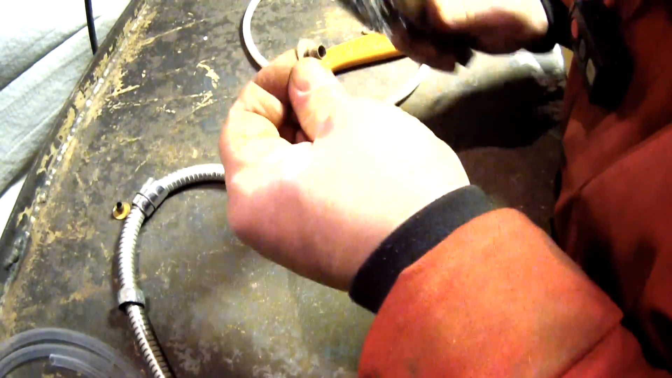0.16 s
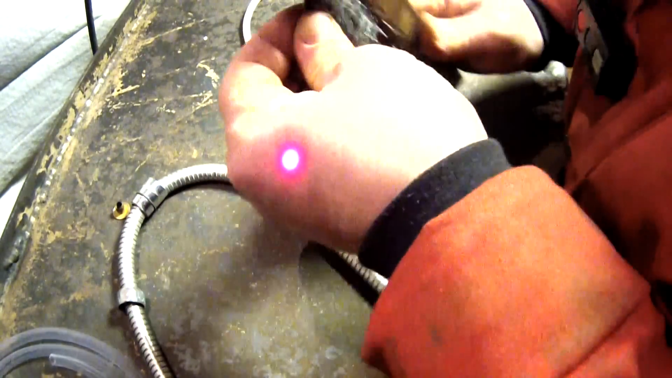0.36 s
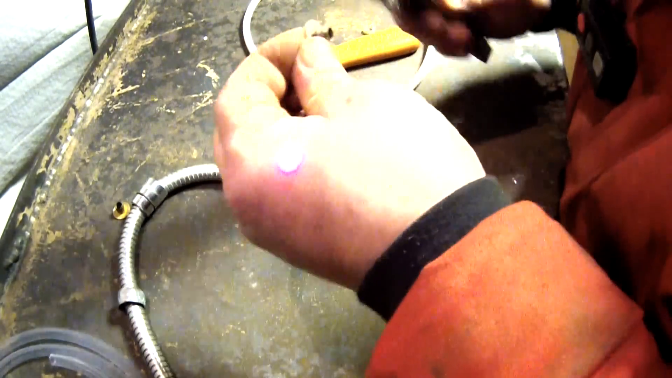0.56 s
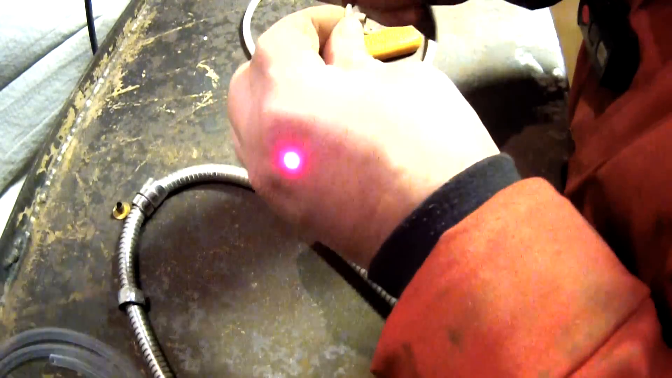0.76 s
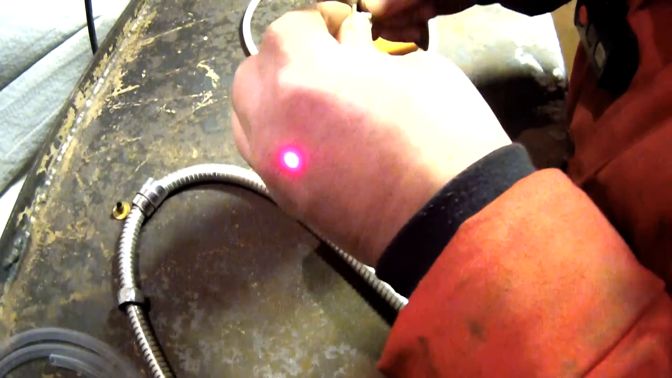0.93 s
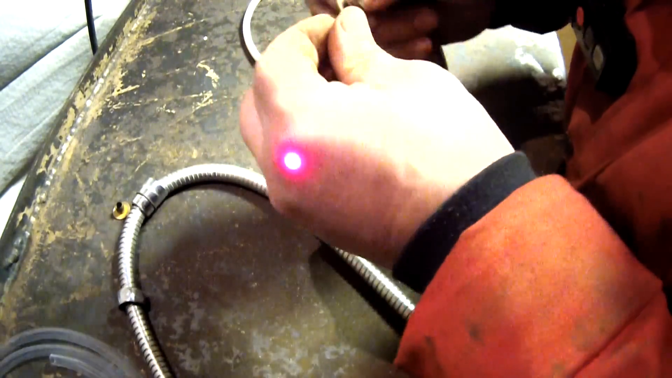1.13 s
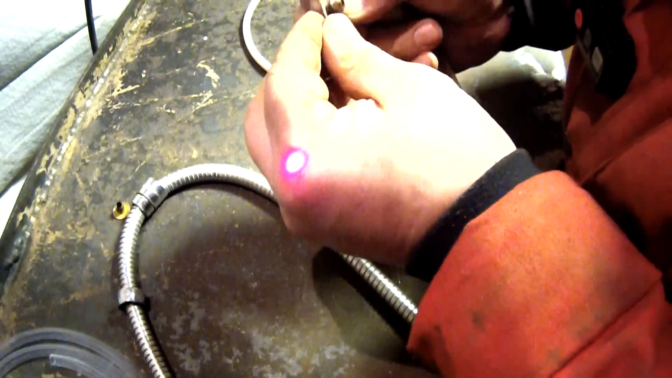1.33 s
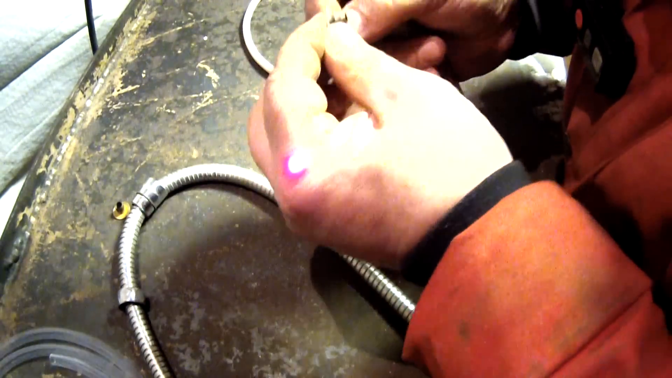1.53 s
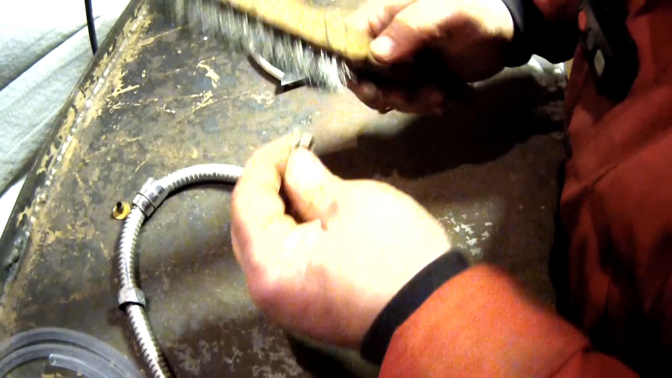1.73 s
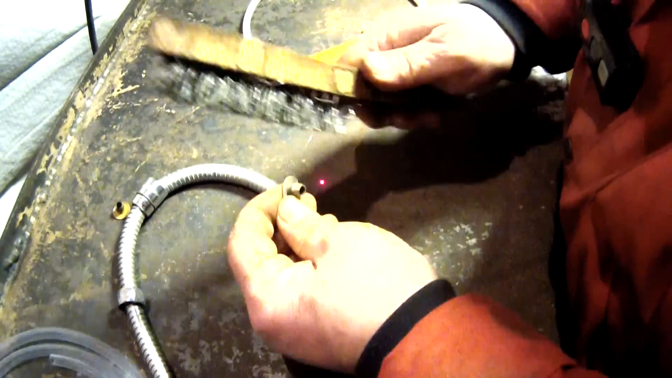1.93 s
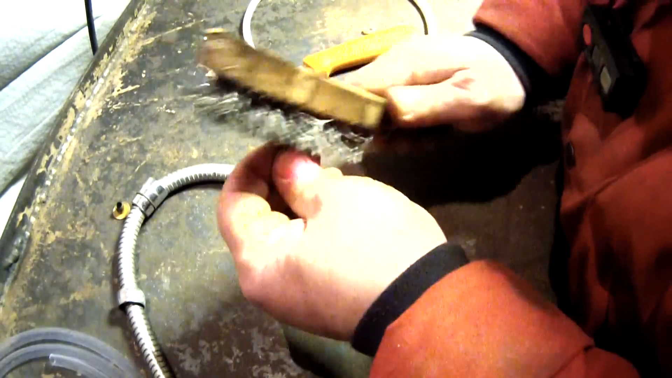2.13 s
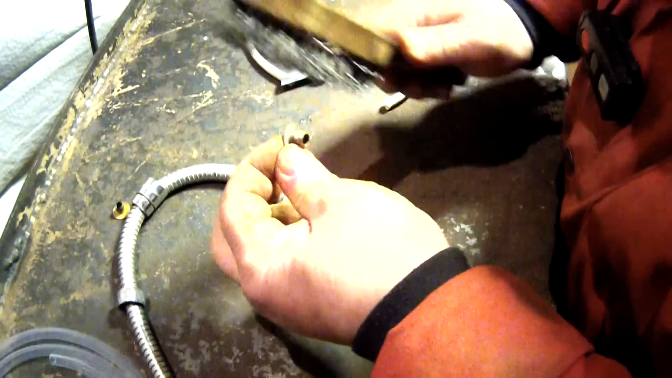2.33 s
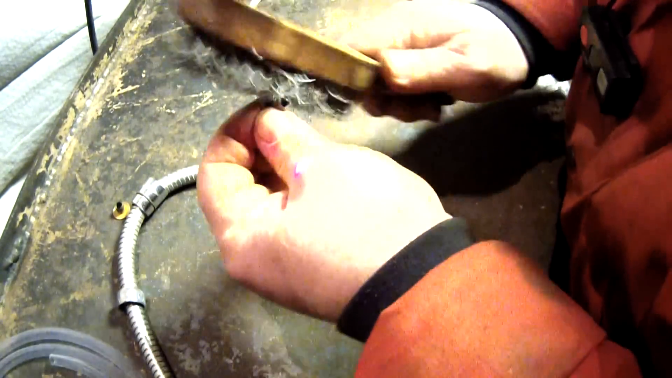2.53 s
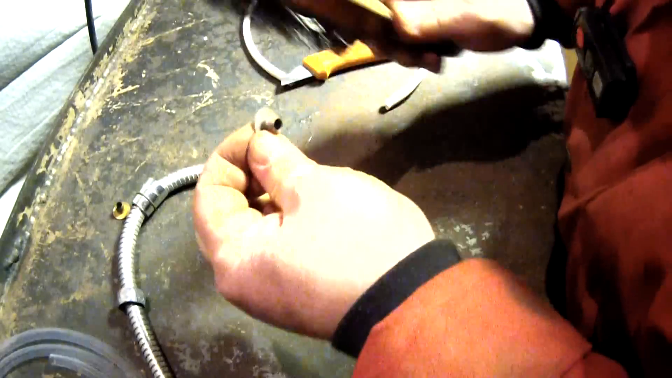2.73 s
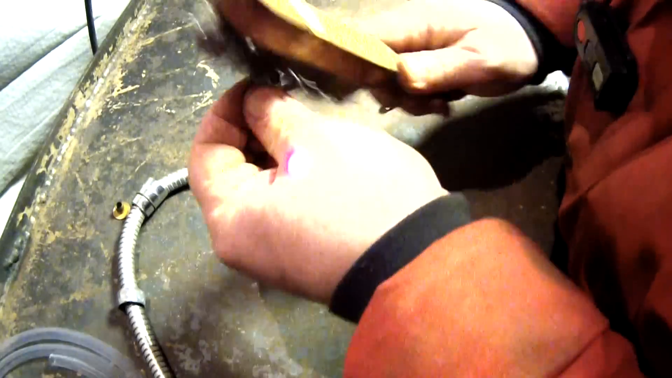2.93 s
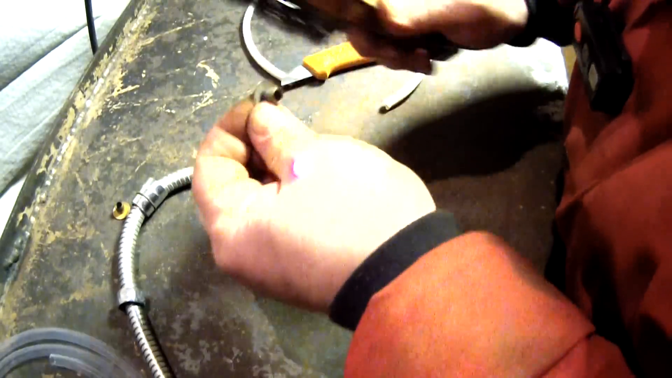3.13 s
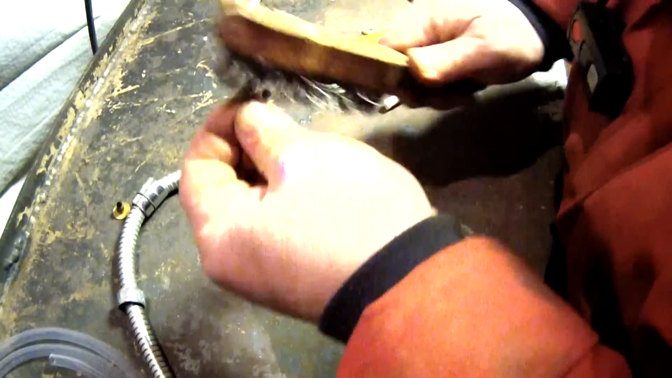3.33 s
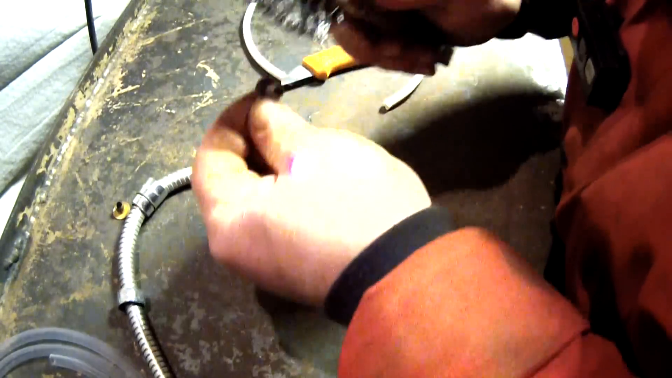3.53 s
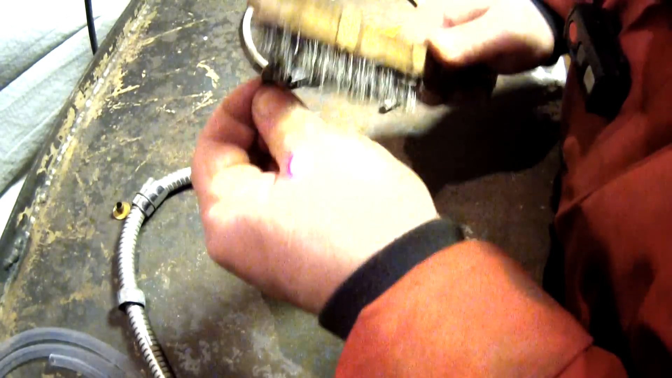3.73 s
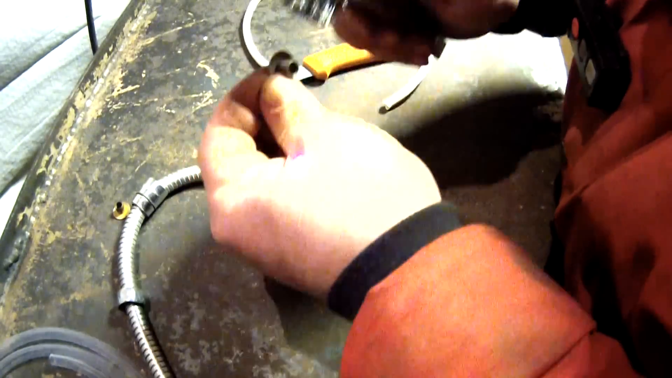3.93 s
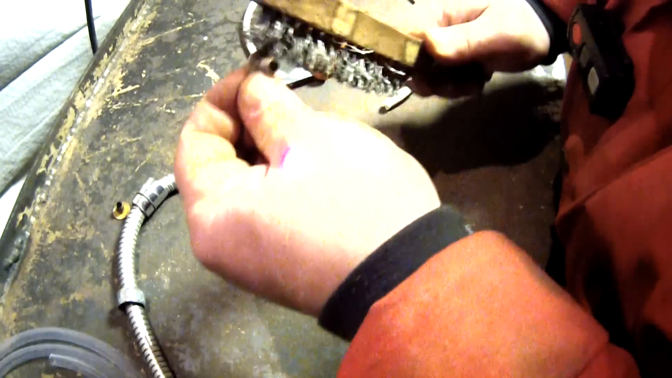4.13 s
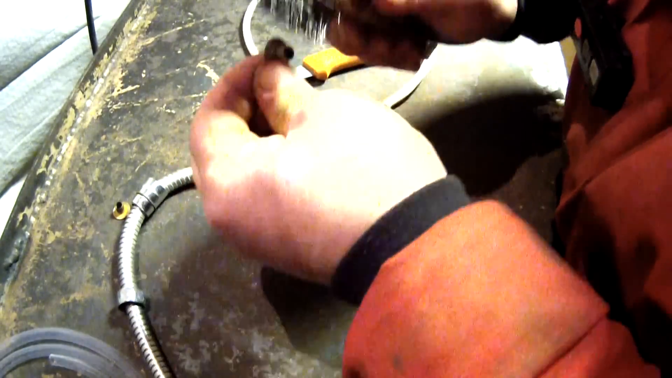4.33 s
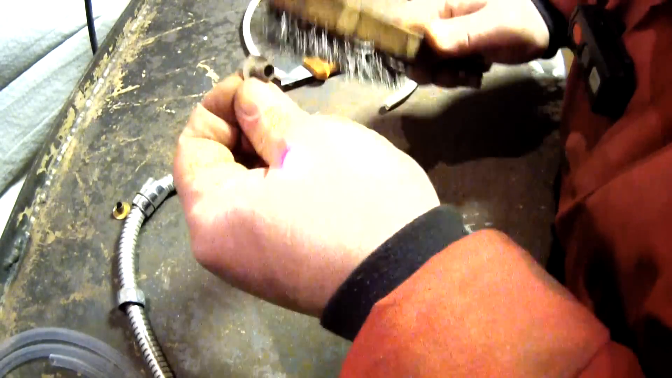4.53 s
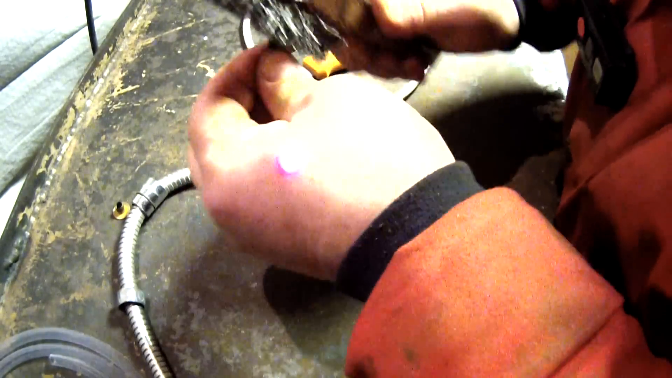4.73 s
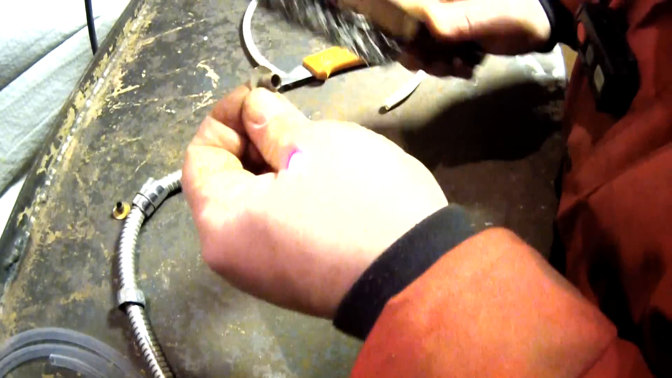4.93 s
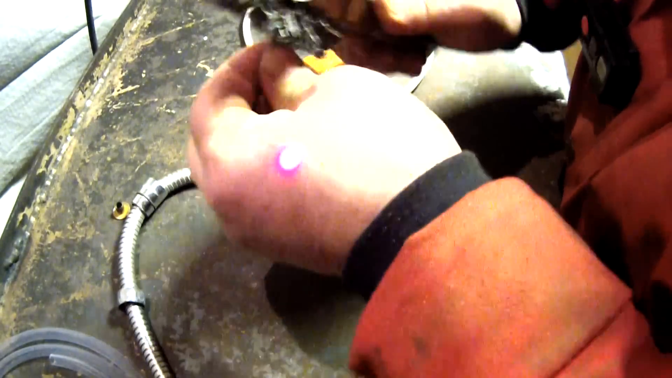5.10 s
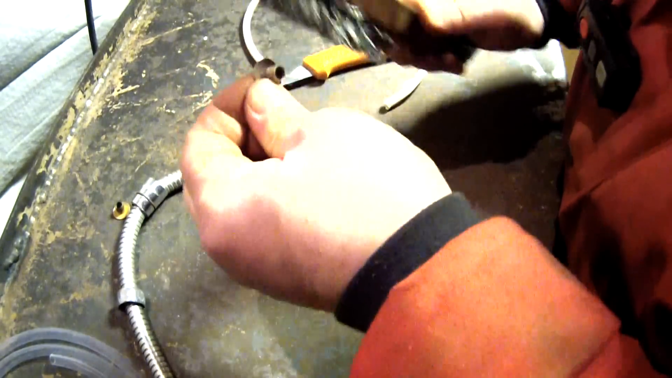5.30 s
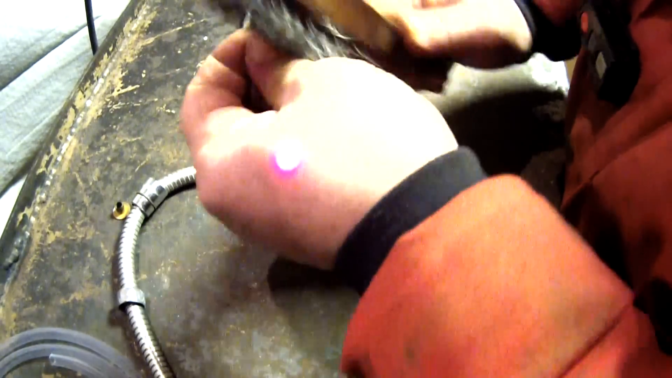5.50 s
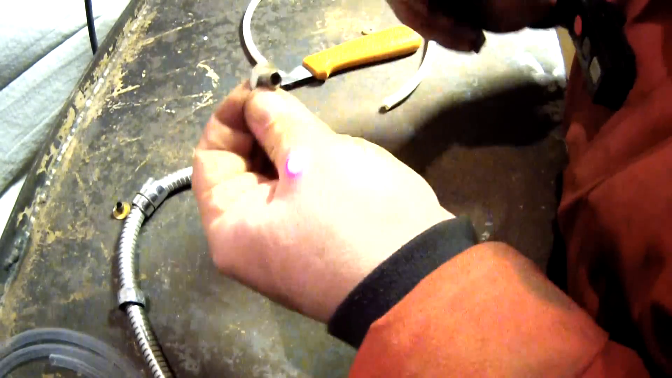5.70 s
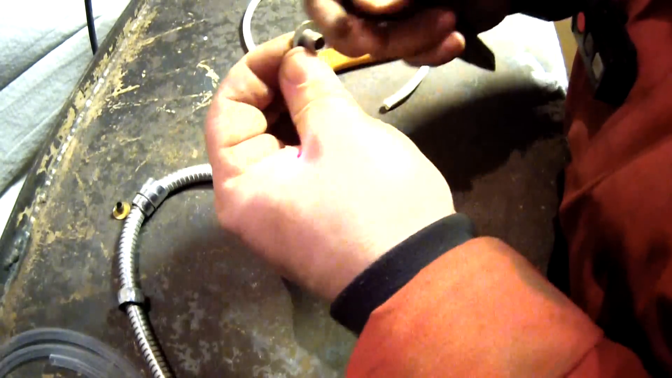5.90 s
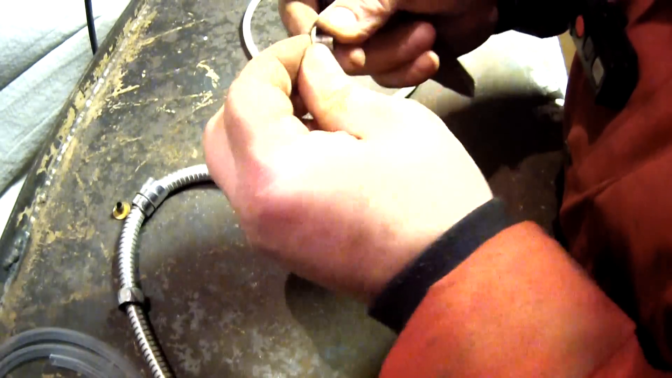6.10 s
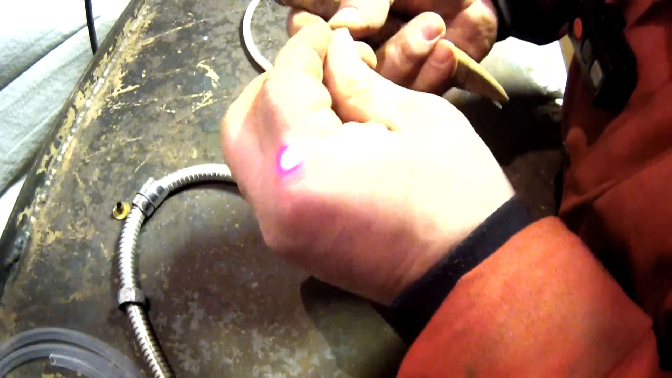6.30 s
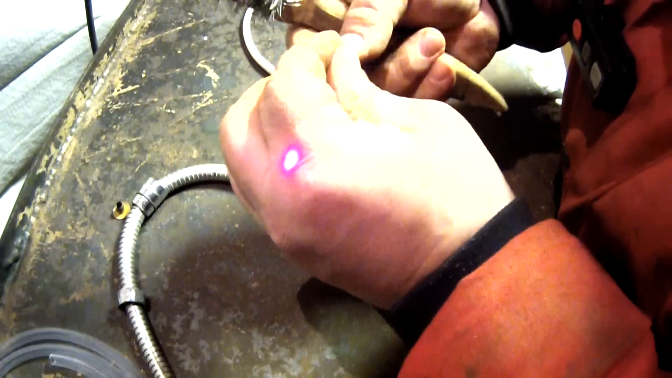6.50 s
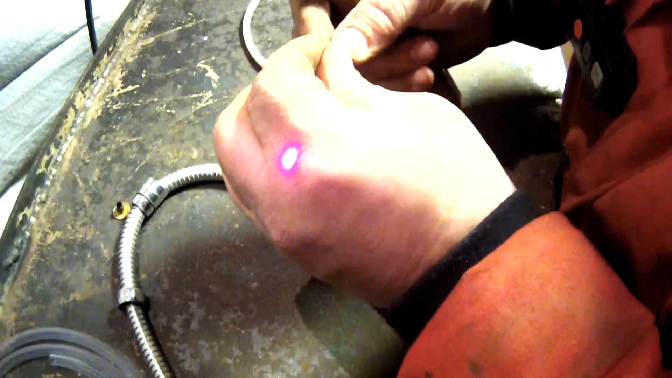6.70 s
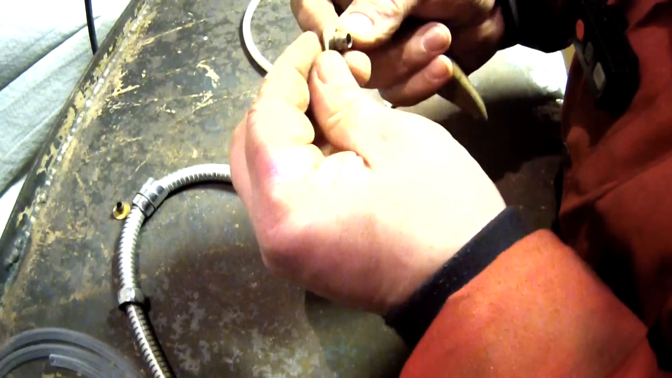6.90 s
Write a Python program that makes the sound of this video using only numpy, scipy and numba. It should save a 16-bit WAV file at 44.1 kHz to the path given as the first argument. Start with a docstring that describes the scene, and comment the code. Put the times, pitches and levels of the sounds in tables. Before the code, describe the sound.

Close up in a quiet workshop, a wire brush rasps twice over a small brass fitting, then stops for over a second with only faint cloth rustle and a small tap. Ten more short, bright scratches follow, roughly two or three a second, with tinny ticks as stiff wires snap off the metal. A dull bench thud comes early in that run. It ends in quiet rustling and hiss.

```python
"""Wire brush on a brass fitting

A steel wire brush is swept across a small brass fitting held in the hand above a workbench, in a quiet shop.
Wire tips catch, spring free and tick: random clicks ring resonances of wires, fitting and wooden brush back.
Between strokes a work sleeve rustles (shaped grains); twice the bench shudders (low noise, then a low tone).
The recorder adds hiss and a standing offset that wanders and flutters."""
import sys
import numpy as np
from scipy import signal
from scipy.fft import rfft, irfft, next_fast_len
from scipy.io import wavfile
from scipy.ndimage import uniform_filter1d
from numba import njit

SR = 44100
rng = np.random.default_rng(int(sys.argv[2]) if len(sys.argv) > 2 else 0)


def store_pcm(level_fs):
    """Save levels as 16-bit WAV."""
    pcm = np.round(np.clip(level_fs, -1, 1) * 32767).astype(np.int16)
    wavfile.write(sys.argv[1], SR, np.atleast_2d(pcm).T)


N = 306495   # length in samples

# The brush strokes. Each row: landing in seconds, swell time in seconds, contact time in seconds,
# full level in dB, sag over the contact in dB, brush back pitch at landing in Hz, the same at lift in Hz,
# brush back level in dB against the scratch, wire bend pitch in Hz, bend level in dB against the scratch,
# sleeve level in dB.
STROKES = [(0.017, 0.038, 0.16, -35.5, 9, 2780, 2430, -14, 3570, -15, -65.5),
           (0.403, 0.017, 0.13, -39, 2.5, 2870, 2450, -7.5, 4340, -6.5, -65),
           (2.16, 0.031, .15, -38.5, 4, 2130, 2160, -12.5, 4300, -18, -68),
           (2.566, 0.035, 0.14, -39.5, 2, 2550, 2200, -9.5, 4240, -11, -69.5),
           (2.964, 0.021, .13, -38.5, 4, 2970, 2600, -9, 4020, -10.5, -63),
           (3.318, 0.033, 0.14, -38, 3.5, 2740, 2100, -13, 4020, -8.5, -61.5),
           (3.683, 0.021, 0.16, -36.5, 15, 1420, 1950, -17.5, 4320, -9.5, -63.5),
           (4.078, 0.034, 0.14, -37.5, 4, 1700, 1650, -19, 4350, -8.5, -65),
           (4.453, 0.015, 0.13, -38, 3, 1600, 1800, -15.5, 4400, -9.5, -65.5),
           (4.814, 0.025, 0.13, -37.5, 3, 1670, 1820, -20, 4370, -10, -65.5),
           (5.186, 0.033, 0.13, -35.5, 7.5, 1700, 2060, -17, 4150, -11, -63),
           (5.534, .025, 0.17, -34.5, 13, 2500, 2040, -19, 4350, -12, -62)]
# The ringing modes of the brass fitting. Each row: pitch in Hz, width in Hz, relative level in dB.
FITTING = [(3740, 330, 4.5), (4173, 300, 0), (5670, 470, 5.5), (6790, 580, 0), (8420, 720, -4.5)]
LIFT_S = 0.12     # time the brush takes to leave the fitting
SETTLE_S = 0.017  # the first tufts land one by one before the brush beds down


def from_db(db):
    """Decibels to gain."""
    return 10 ** (np.asarray(db) / 20)


def rms_one(x):
    """Scale to an rms (average strength) of 1."""
    return x / np.sqrt(np.mean(x ** 2) + 1e-20)


def at_hz(points, hz):
    """Read a spectrum at any pitch, along a log-frequency axis."""
    points_hz, points_db = np.array(points).T
    return np.interp(np.log(hz), np.log(points_hz), points_db)


def drift(rate):
    """Slow random wander of rms 1: noise sent twice through a one-pole low-pass at rate Hz."""
    r = np.exp(-2 * np.pi * rate / SR)
    warm_up = 9000   # samples dropped while the filter settles
    noise = rng.standard_normal(N + warm_up)
    return rms_one(signal.lfilter([1], [1, -2 * r, r * r], noise)[warm_up:])


def resonate(x, hz, width_hz):
    """Ring at one pitch: a two-pole resonance with gain 1 at its top."""
    r = np.exp(-np.pi * width_hz / SR)
    feed = np.array([1, 0, -1]) * (1 - r * r) / 2
    feedback = [1, -2 * r * np.cos(2 * np.pi * hz / SR), r * r]
    return signal.lfilter(feed, feedback, x + 1e-18)


@njit
def gliding(x, hz, r, sr):
    """Ring at a pitch that moves: a two-pole resonance retuned at every sample."""
    y = np.zeros(len(x))
    for i in range(2, len(x)):
        bounce = 2 * r * np.cos(2 * np.pi * hz[i] / sr) * y[i - 1]
        y[i] = x[i] - x[i - 2] + bounce - r * r * y[i - 2]
    return y


def glide(x, hz, width_hz):
    """Moving resonance applied twice for steep skirts; it catches and lets go as the wires shift; rms 1."""
    r = np.exp(-np.pi * width_hz / SR)
    uneven = x * from_db(5.6 * drift(38))
    return rms_one(gliding(gliding(uneven, hz, r, SR), hz, r, SR))


def coloured(x, spectrum):
    """Shape noise-like input to a spectrum; rms 1."""
    size = next_fast_len(N)
    hz = np.maximum(np.arange(size // 2 + 1) * SR / size, 1)
    shaped = rfft(x, size) * from_db(at_hz(spectrum, hz))
    return rms_one(irfft(shaped, size)[..., :N])


def panned(x, pan_db):
    """Left above right by pan_db, with the mean gain of both sides kept."""
    sides = from_db([[pan_db / 2], [-pan_db / 2]])
    return x * sides / sides.mean()


def ticks(per_s, spread_db):
    """Random clicks of uneven size and sign."""
    sizes = from_db(spread_db * np.minimum(rng.exponential(1, N), 5))
    signs = rng.choice([-1, 1], N)
    return sizes * signs * (rng.random(N) < per_s / SR)


def plateau(start, length, db, rise, fall):
    """Level in dB over time: rises to db at start, holds, falls; slopes in dB per second."""
    t = np.arange(N) / SR
    return db - rise * np.maximum(start - t, 0) - fall * np.maximum(t - start - length, 0)


def strokes_at(t):
    """Seconds since the latest landing, and the other columns of that stroke."""
    rows = np.array(STROKES)
    latest = np.maximum(np.searchsorted(rows[:, 0], t) - 1, 0)
    start, *columns = rows[latest].T
    return t - start, columns


def touching():
    """1 from landing to the end of the lift, else 0, with softened edges."""
    since, (_, contact, *_) = strokes_at(np.arange(N) / SR)
    return uniform_filter1d(1. * (since >= 0) * (since < contact + LIFT_S), size=100)


def shop(x):
    """Short diffuse reflections off bench and body: fading noise as an echo pattern, its own on each side."""
    t60_s = 0.073   # time to fade by 60 dB
    t = np.arange(round(.25 * SR)) / SR
    tails = rng.standard_normal((2, len(t))) * from_db(-60 * t / t60_s) * (t > .002)
    tails = tails / np.sqrt(np.sum(tails ** 2, axis=1, keepdims=True))
    return signal.fftconvolve(x[None], tails, axes=1)[:, :N]


def bench():
    """The bench top rattles dully when leant on and dies away; a moment later it rings low."""
    # The shudders. Each row: start in seconds, rattle level in dB, time for the rattle to fade by 60 dB
    # in seconds, wait for the ring in seconds, ring length in seconds, ring level in dB.
    shudders = [(2.271, -50, 0.39, 0.057, 0.059, -53), (6.713, -62, 1.35, 0.046, 0.027, -58)]
    ring_hz, waver = 165, .03   # waver: spread of the pitch as a share of it
    rattle_db = np.max([plateau(s, 0, db, 3000, 60 / t60) for s, db, t60, *_ in shudders], axis=0)
    ring_db = np.max([plateau(s + wait, length, db, 500, 700)
                      for s, _, _, wait, length, db in shudders], axis=0)
    phase = 2 * np.pi * np.cumsum(ring_hz * (1 + waver * drift(40))) / SR
    ring = np.sqrt(2) * np.sin(phase - np.array([[0], [.8]]))   # reaches the right side a little later
    dull = signal.butter(2, [70, 420], "band", fs=SR, output="sos")
    rattle = rms_one(signal.sosfilt(dull, rng.standard_normal((2, N))))
    return from_db(ring_db) * ring + from_db(rattle_db) * rattle


def sleeve():
    """Stiff cloth rubs as the arm swings: fine grains, a little patchy, a fold that favours one pitch."""
    # The arm shifts between runs of strokes. Each row: start in seconds, length in seconds, level in dB.
    arm_shifts = [(0.627, 0.2, -64.5), (1.2, 0.15, -72.5), (1.684, 0.16, -66.5), (1.812, 0.11, -70.5),
                  (3.12, .14, -62.5), (5.708, .22, -61.5), (5.94, 0.14, -66.5), (6.126, 0.59, -74.5),
                  (6.86, 0.045, -74)]
    # The colour of the cloth. Each row: frequency in Hz, relative level in dB per Hz.
    cloth = [(180, -17), (300, -28), (445, -3.5), (505, -10), (798, -3.5), (1360, -4.5), (3300, -1.5),
             (5460, 1), (13000, -21.5)]
    swing_s, swing_db_per_s = 0.034, 40   # the rustle swells up to swing_s before a landing
    edge_db_per_s, rest_db = 220, -86.5
    swings = [plateau(row[0] - swing_s, swing_s + row[2], row[-1], swing_db_per_s, edge_db_per_s)
              for row in STROKES]
    shifts = [plateau(s, length, db, edge_db_per_s, edge_db_per_s) for s, length, db in arm_shifts]
    level_db = np.maximum(np.max(swings + shifts, axis=0), rest_db)
    grains = coloured(ticks(12000, 2.9) * from_db(drift(7.2)), cloth)
    fold = from_db(-9.5) * resonate(grains, 2330, 255)
    return panned(from_db(level_db) * (grains + fold), 5.5)


def blow(s, db, modes, contact_s):
    """A contact burst that swells and dies rings each mode to its height: (start sample, sound)."""
    t = np.arange(1200) / SR
    burst = rng.standard_normal(len(t)) * t * np.exp(-2 * t / contact_s)
    rung = 0
    for hz, width, mode_db in modes:
        ring = resonate(resonate(burst, hz, width), hz, 2 * width)
        rung = rung + from_db(mode_db) * ring / np.abs(ring).max()
    return round(s * SR), from_db(db) * rung / np.abs(rung).max()


def knocks():
    """Short blows ring what they hit: stiff tufts on the fitting, a knuckle on the brush back, a faint tick."""
    # Stiff tufts that strike the fitting. Each row: time in seconds, peak level in dB before panning.
    snaps = [(0.0187, -29), (0.0842, -25.5), (0.1017, -29), (0.407, -37), (0.4226, -44), (0.4686, -28.5),
             (2.162, -40), (2.393, -46), (2.591, -38), (2.616, -29), (2.6483, -29), (2.9897, -31),
             (3.3218, -26), (3.345, -30), (3.687, -35.5), (3.704, -35), (3.7337, -26.5), (3.796, -30),
             (3.8342, -39), (4.0787, -43), (4.107, -37), (4.1345, -28.5), (4.151, -31), (4.1659, -30),
             (4.189, -32), (4.457, -44), (4.4743, -28), (4.502, -24.5), (4.631, -44.5), (4.8323, -34),
             (4.8626, -27), (5.1927, -25.5), (5.217, -27), (5.5367, -34), (5.5636, -28), (5.5918, -27),
             (5.7043, -40.5)]
    # The brush back when tapped. Each row: pitch in Hz, width in Hz, relative level in dB.
    tap_modes = [(850, 200, -3.5), (1640, 350, -0.5), (5300, 2200, -3)]
    since, _ = strokes_at(np.array(snaps)[:, 0] + .003)
    low_db = -12 + 17 * np.exp(-np.abs(since) / SETTLE_S)   # lower modes are stronger as the brush lands
    blows = []
    for (s, db), low in zip(snaps, low_db):
        modes = [(hz, width, mode_db + low * (hz < 4800)) for hz, width, mode_db in FITTING]
        blows.append(blow(s, db, modes, 0.0017))
    blows.append(blow(1.809, -39, tap_modes, 0.00057))            # a knuckle taps the brush back
    blows.append(blow(6.817, -63, [(1990, 150, 0)], 0.00091))     # a faint tick
    out = np.zeros(N)
    for at, sound in blows:
        out[at:at + len(sound)] += sound
    return out


def scratch():
    """Tips release in bunches as tufts pass; each rings a few cycles and shakes fitting, wires and back."""
    # The colour of the wire tips. Each row: frequency in Hz, relative level in dB per Hz.
    wires = [(150, -58), (250, -29.5), (441, -18.5), (975, -28), (2430, -10), (2650, -5), (3090, -14.5),
             (4440, -5), (5550, 2.5), (14300, -19.5), (15400, -22)]
    since, columns = strokes_at(np.arange(N) / SR)
    swell, contact, full_db, sag_db, back_from, back_to, back_db, bend_hz, bend_db, _ = columns
    along = np.clip(since / contact, 0, 1)   # 0 at landing, 1 at lift
    lifted = np.clip(since - contact, 0, LIFT_S)

    landing_db = -14.5 * np.exp(-(since / swell) ** 2)   # starts below full pressure
    lift_db = np.maximum(-459 * lifted, -14 - 178 * lifted)   # a few last tips drag on after the lift
    level_db = full_db + landing_db - sag_db * along + lift_db
    # over the contact the back rings less and the wires bend higher
    back_hz = back_from + (back_to - back_from) * along
    back_db = back_db - 6.5 * along
    bend_hz = bend_hz + 250 * (2 * along - 1)

    early = np.exp(-np.abs(since) / SETTLE_S)   # lone tufts: uneven, ringing the brass, not yet shaking the back
    bunching_db = (1.06 + 3.5 * early) * (drift(66) + drift(150))
    release = ticks(15000, 0.5) * from_db(bunching_db)

    pitches = np.geomspace(300, 15000, 24)
    dealt = rng.integers(0, len(pitches), N)   # each release goes to one pitch
    tips = 0
    for k, hz in enumerate(pitches):
        patch_db = 2.5 * drift(14)   # each wire length catches and lets go in its own time
        thin_db = -6.5 * early * (hz < 3300)   # long wires join only once the brush beds down
        gain = from_db(at_hz(wires, hz) + patch_db + thin_db)
        tips = tips + gain * resonate(release * (dealt == k), hz, hz / 7.55)
    tips = rms_one(tips)

    brass = sum(from_db(db) * resonate(resonate(release, hz, width), hz, 2 * width)
                for hz, width, db in FITTING)
    body = rms_one(tips + from_db(-10 + 4.8 * early) * rms_one(brass))
    back = from_db(back_db - 9.9 * early) * glide(release, back_hz, 360)
    bend = from_db(bend_db) * glide(release, bend_hz, 880)
    sizzle = signal.sosfilt(signal.butter(3, 8000, "high", fs=SR, output="sos"), tips)
    sizzle_db = -13.5 + 1.9 * (level_db + 26) - 7.1 * early   # the harder the stroke, the brighter the tips
    moving = back + bend + from_db(sizzle_db) * rms_one(sizzle)
    return touching() * from_db(level_db) * (body + moving)


def scene():
    """Brush to the left with its reflections, sleeve and bench."""
    brush = scratch() + knocks()
    reflections = from_db(-9.5) * shop(brush)
    return panned(brush, 5) + reflections + sleeve() + bench()


def record(dry):
    """The recorder: hiss, a narrower top, a standing offset that wanders and flutters in fits, a steep top cut."""
    # The colour of the hiss. Each row: frequency in Hz, relative level in dB per Hz.
    hiss = [(400, -45), (600, -24), (760, -5), (2000, -7), (6000, -7), (10000, -8), (13000, -11.5),
            (15400, -31)]
    # The standing offset. Each row: share of full scale, left then right.
    offset = [
        [.0036],
        [.0723],
    ]
    # Slow unrest of the offset. Each row: level in dB, left then right.
    wander_db = [
        [-72],
        [-57.5],
    ]
    # Quick unrest of the offset. Each row: level in dB, left then right.
    flutter_db = [
        [-76.5],
        [-77.5],
    ]
    left, right = dry + from_db(-69.5) * coloured(rng.standard_normal((2, N)), hiss)

    # above 13200 Hz both sides hear alike
    side_top = signal.butter(3, 13200, "high", fs=SR, output="sos")
    narrowing = signal.sosfiltfilt(side_top, (left - right) / 2)
    heard = np.array([left - narrowing, right + narrowing])

    jolt_db = 3 * touching()   # each stroke shakes the recorder a little
    fits = from_db([6.4 * drift(9.5), 5.4 * drift(12.3)] + jolt_db)
    wander = from_db(wander_db) * rms_one(fits * [drift(56), drift(50.5)])
    quick = signal.butter(3, [110, 380], "band", fs=SR, output="sos")
    flutter = rms_one(fits ** 0.97 * signal.sosfilt(quick, rng.standard_normal((2, N))))
    unsteady = heard + wander + from_db(flutter_db) * flutter

    top_cut = signal.ellip(10, .5, 75, 15300, fs=SR, output="sos")
    return signal.sosfilt(top_cut, unsteady) + offset


dry = scene()
out = record(dry)
store_pcm(out)
```